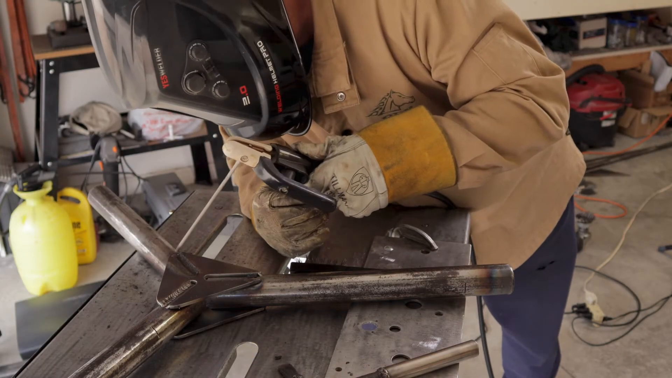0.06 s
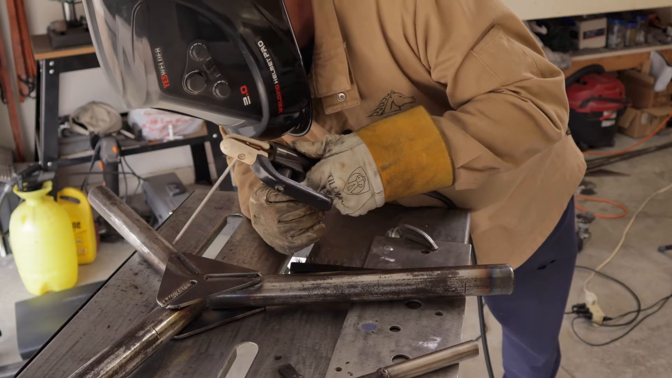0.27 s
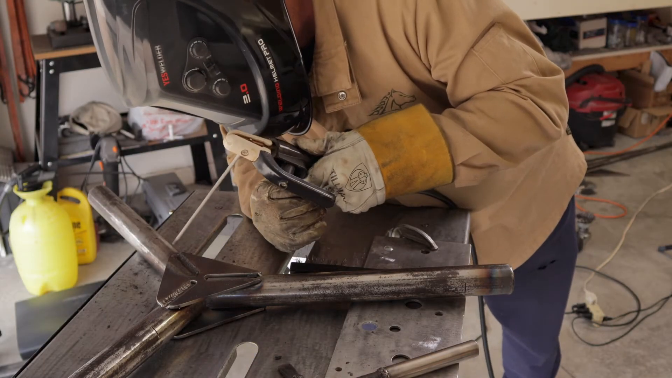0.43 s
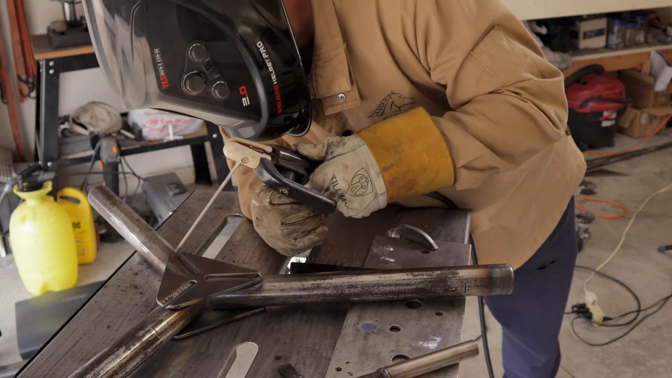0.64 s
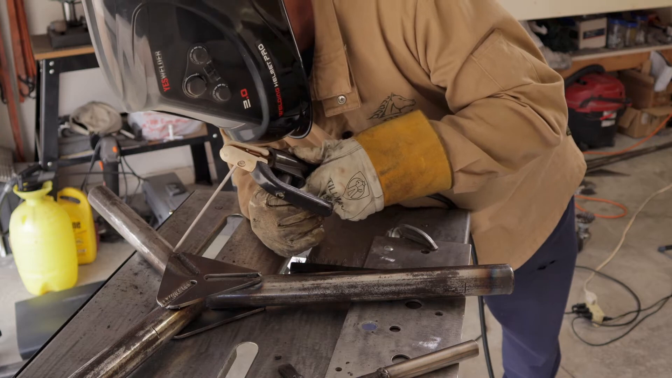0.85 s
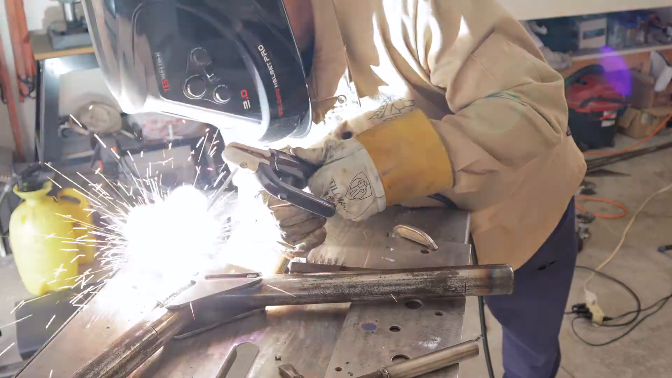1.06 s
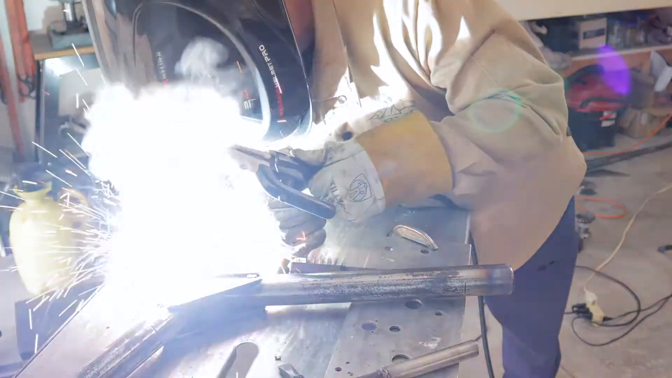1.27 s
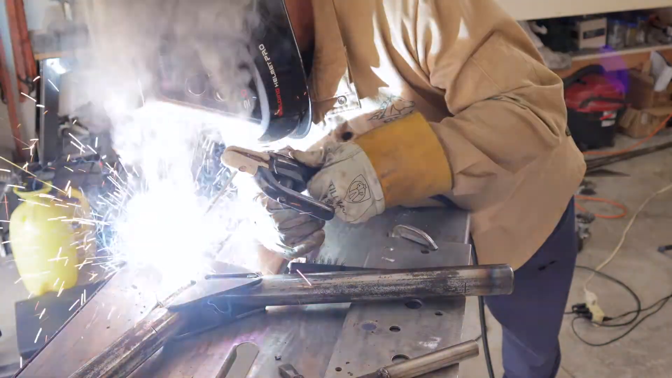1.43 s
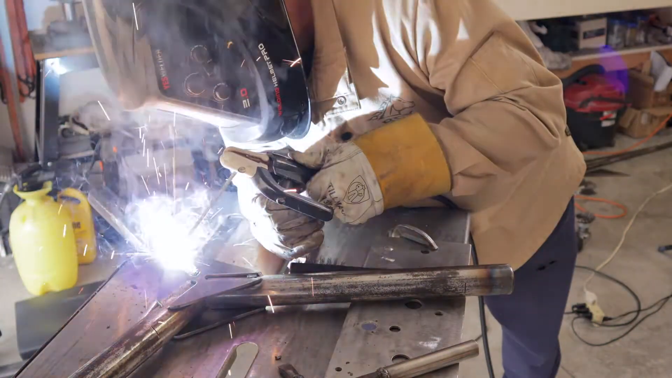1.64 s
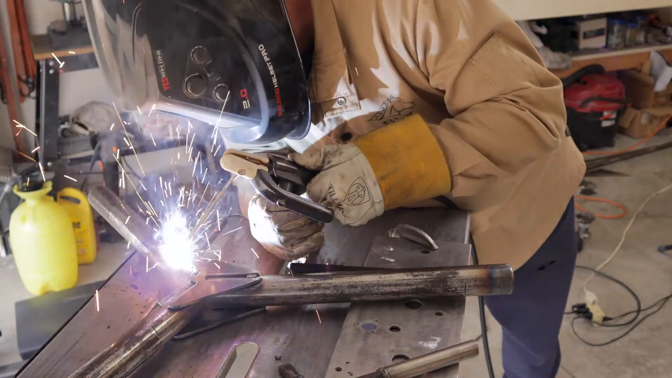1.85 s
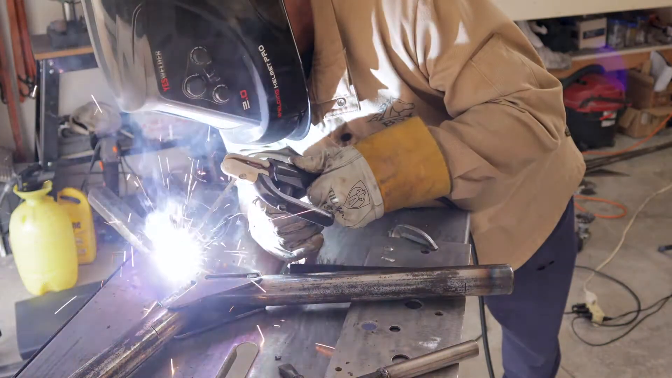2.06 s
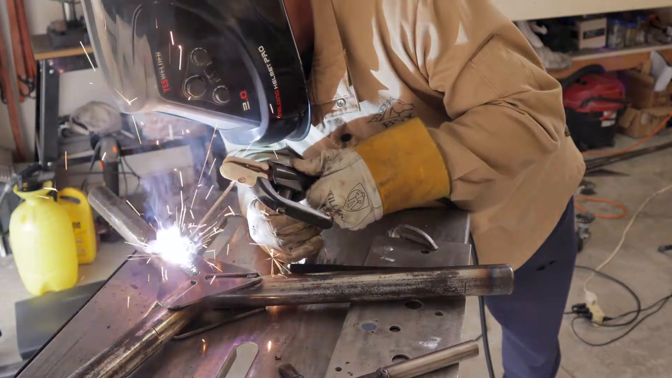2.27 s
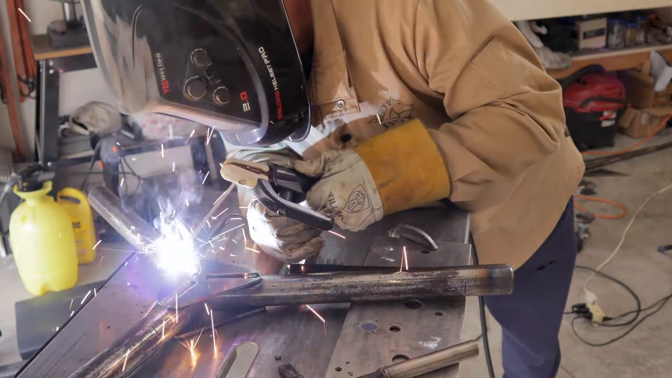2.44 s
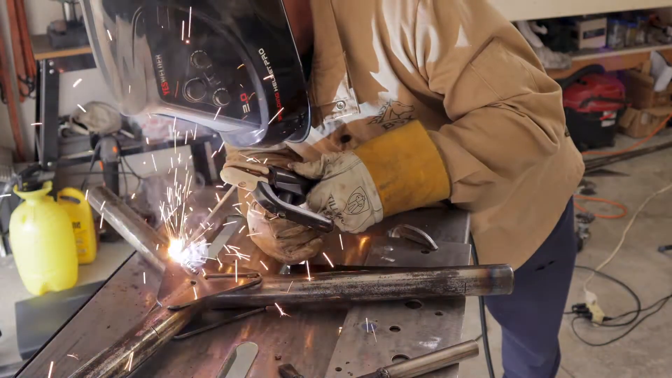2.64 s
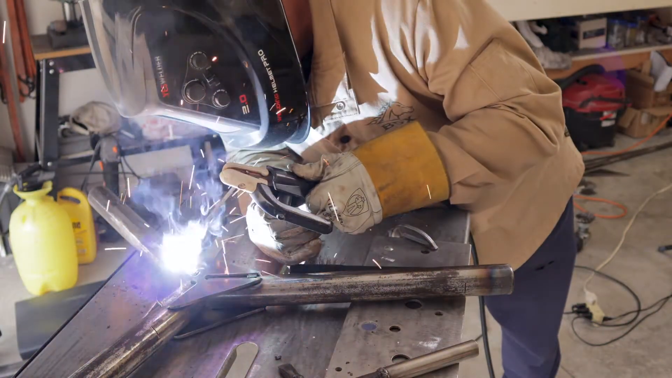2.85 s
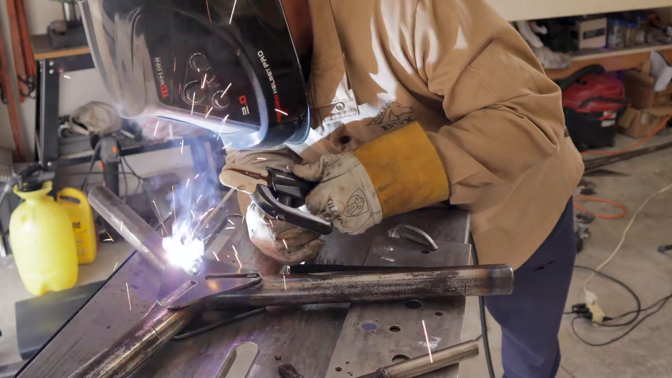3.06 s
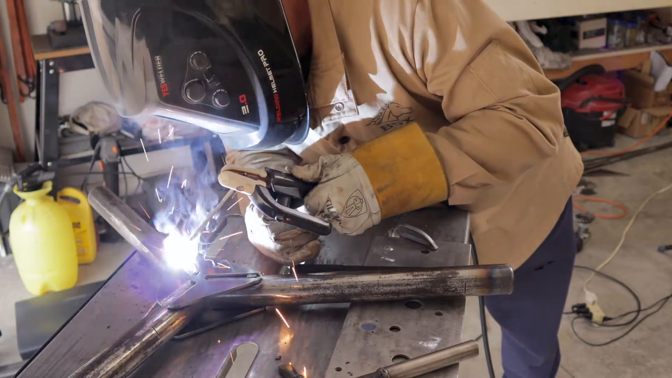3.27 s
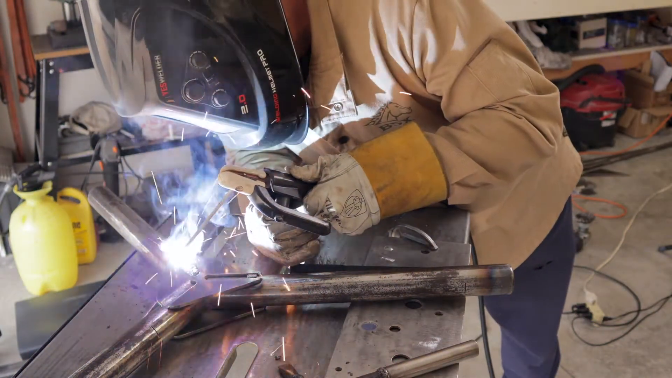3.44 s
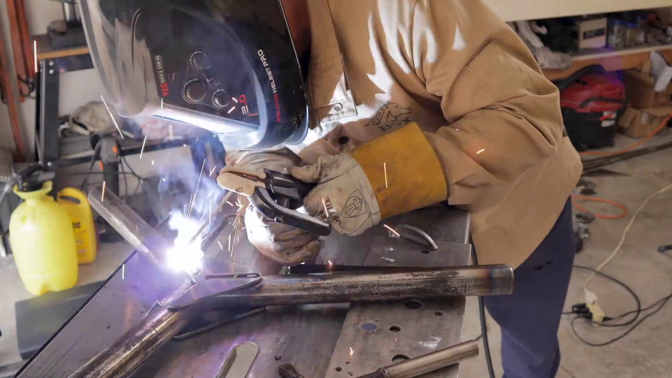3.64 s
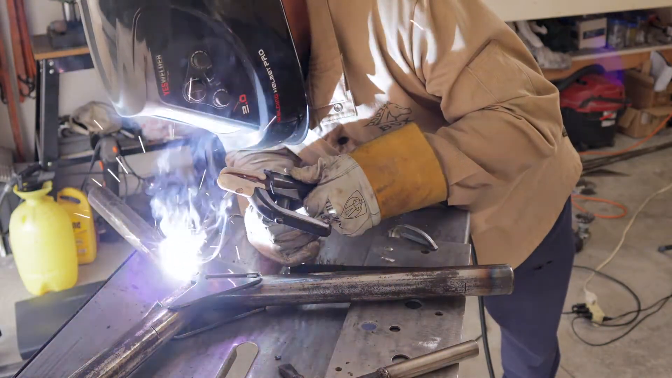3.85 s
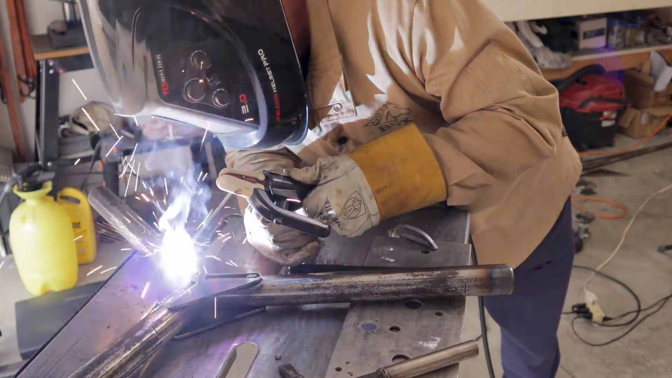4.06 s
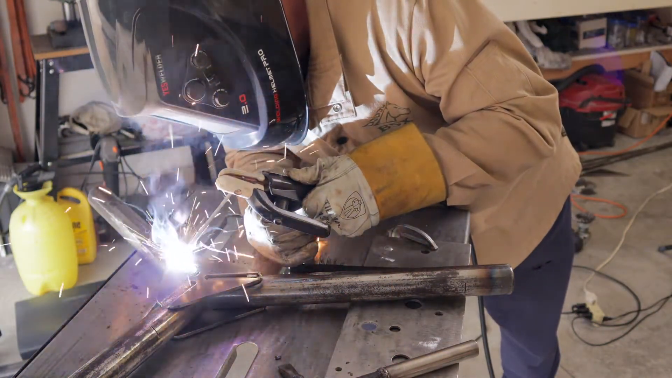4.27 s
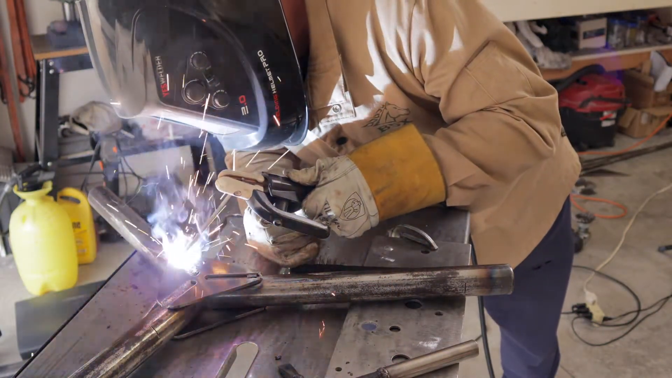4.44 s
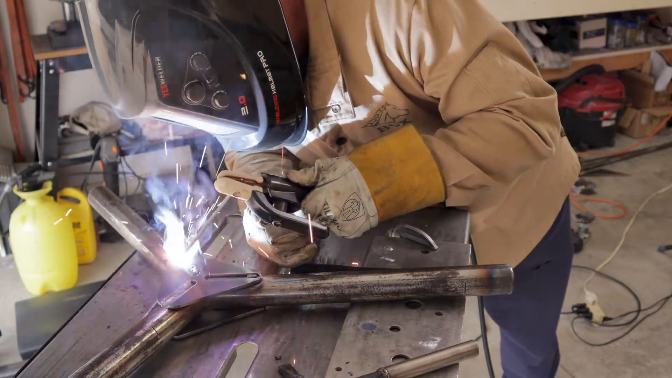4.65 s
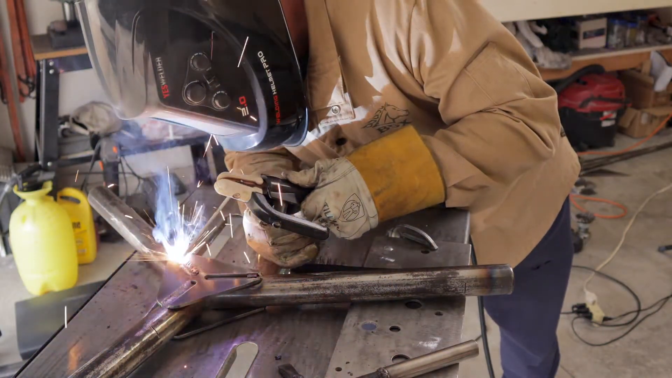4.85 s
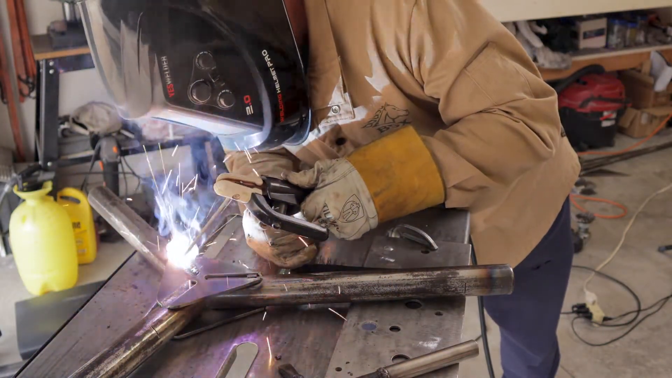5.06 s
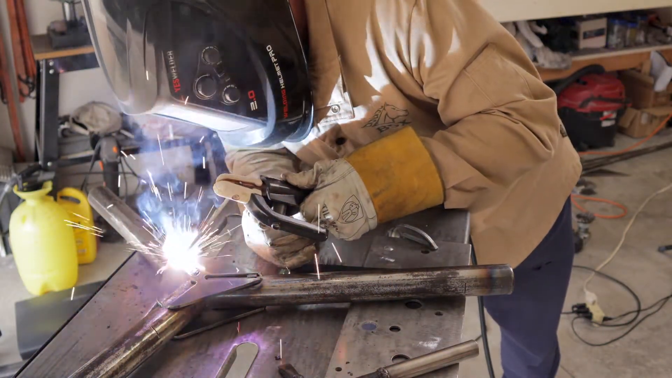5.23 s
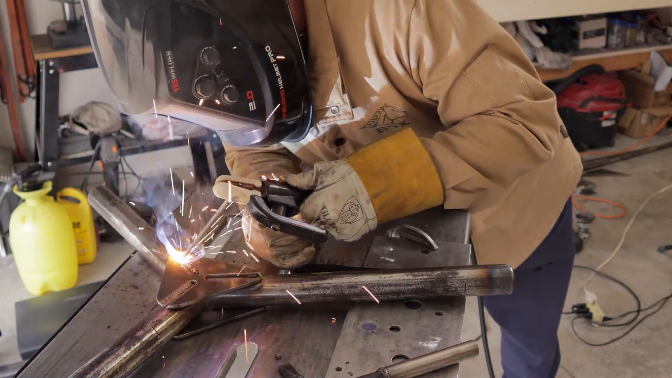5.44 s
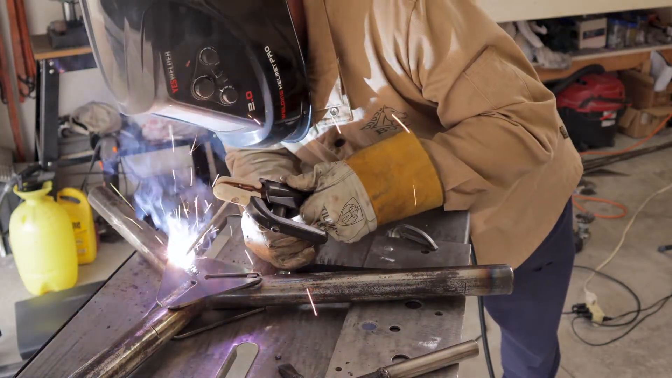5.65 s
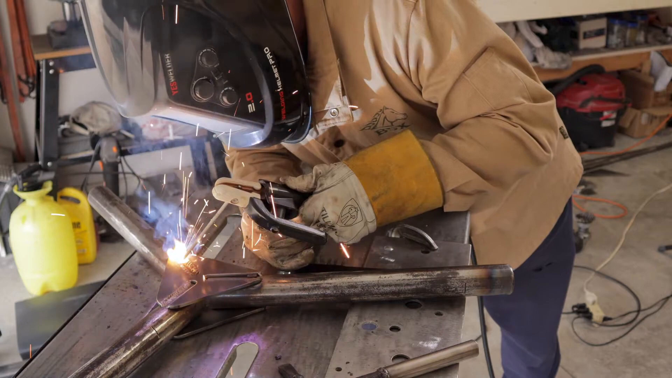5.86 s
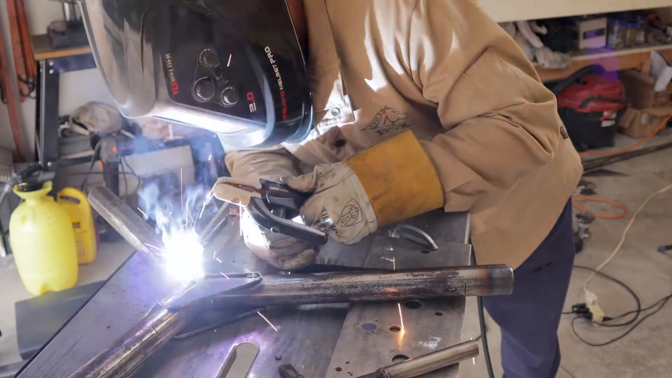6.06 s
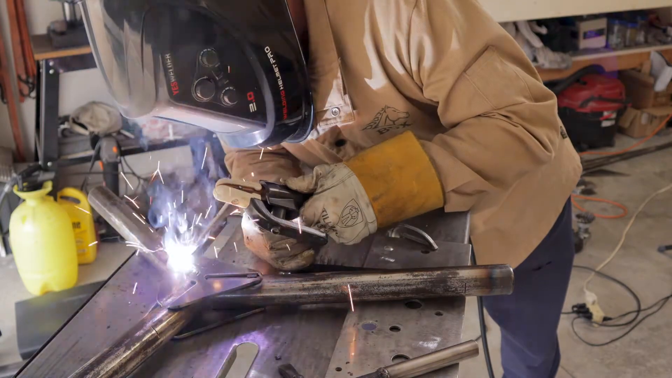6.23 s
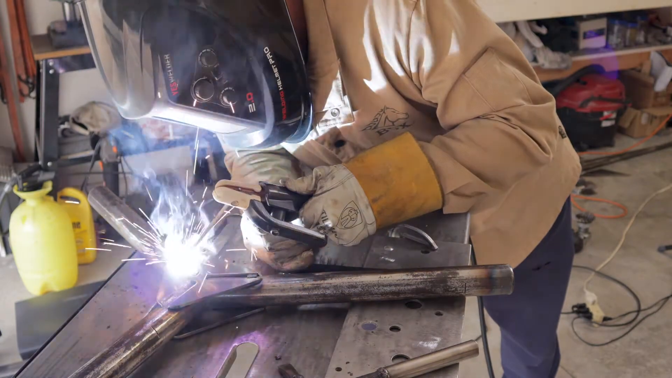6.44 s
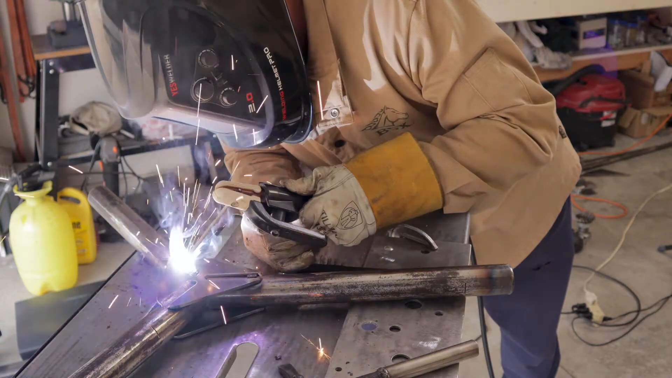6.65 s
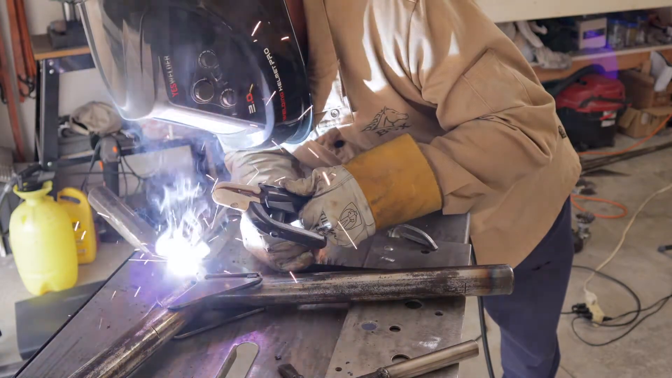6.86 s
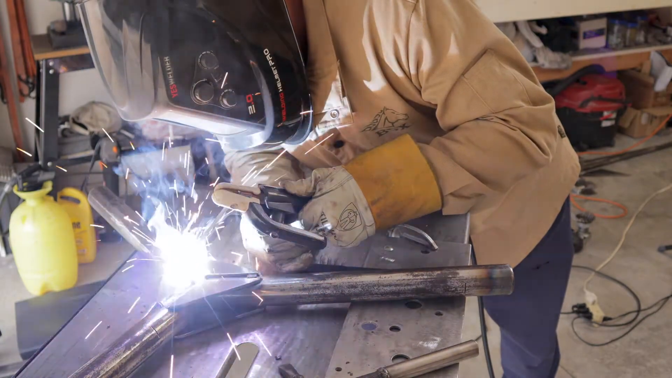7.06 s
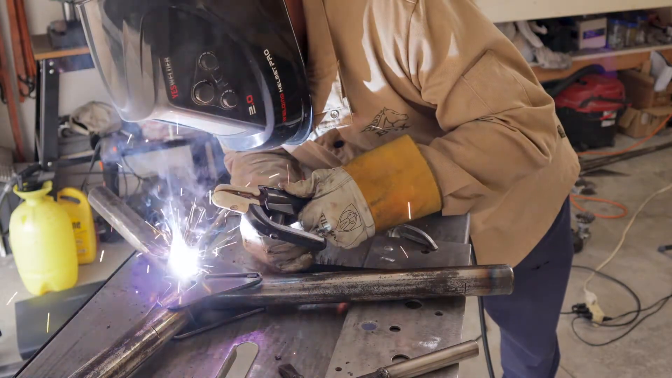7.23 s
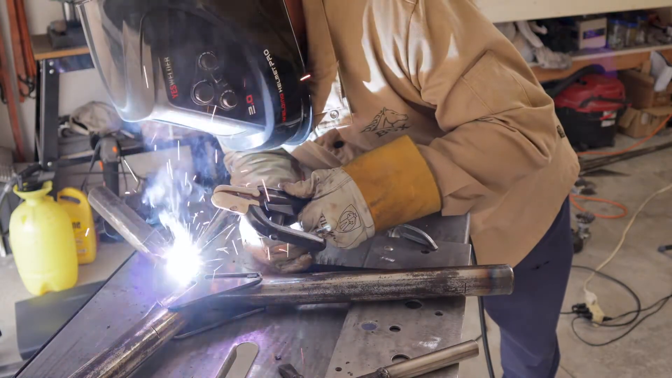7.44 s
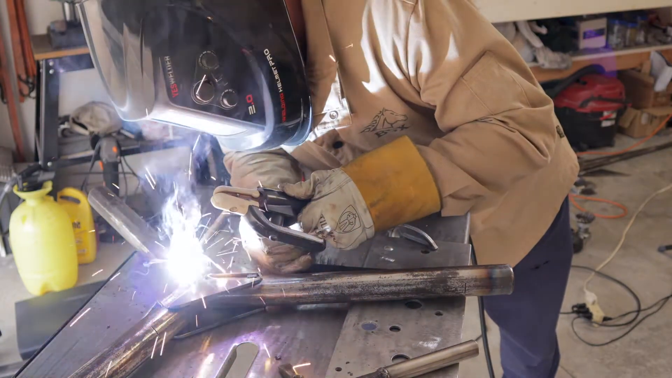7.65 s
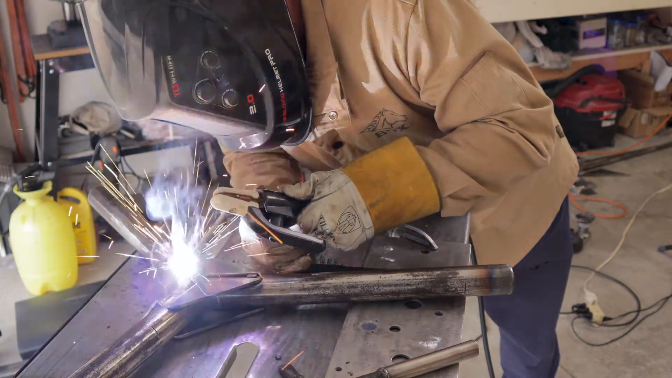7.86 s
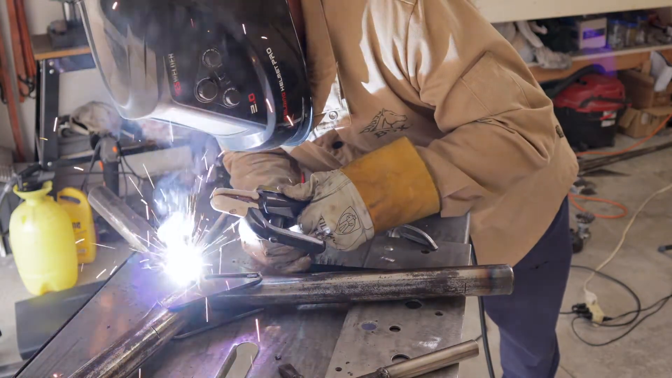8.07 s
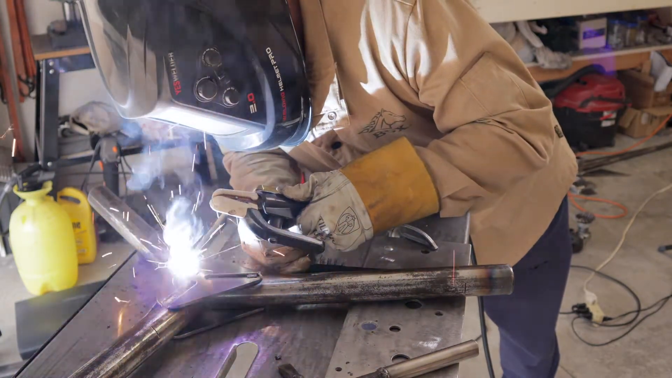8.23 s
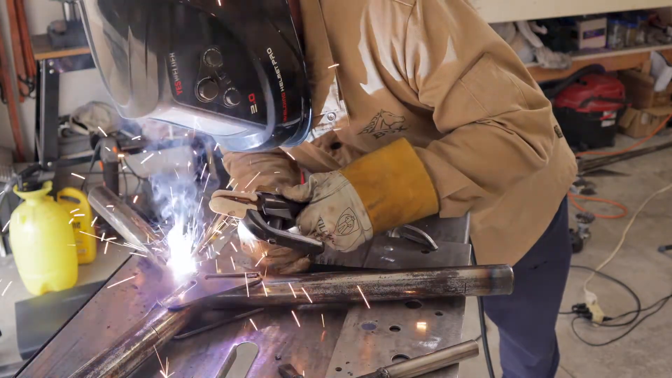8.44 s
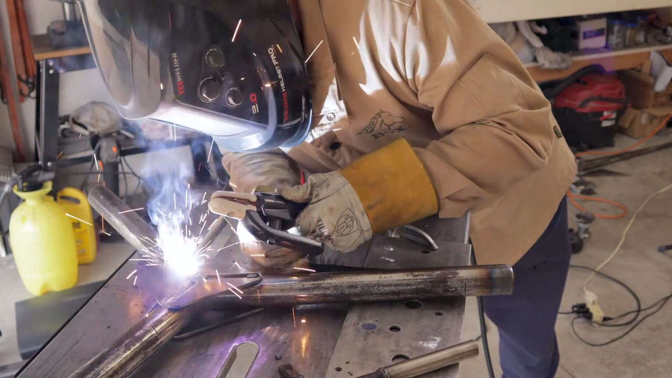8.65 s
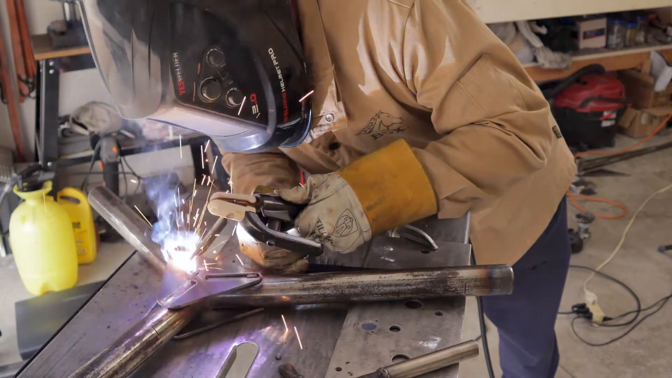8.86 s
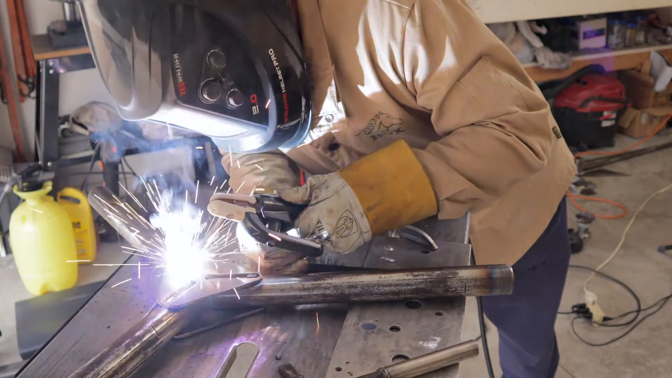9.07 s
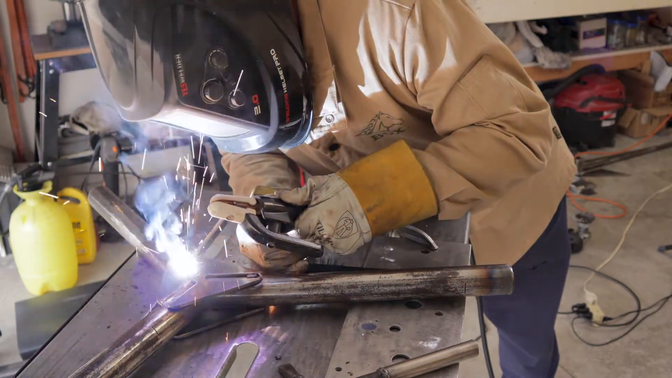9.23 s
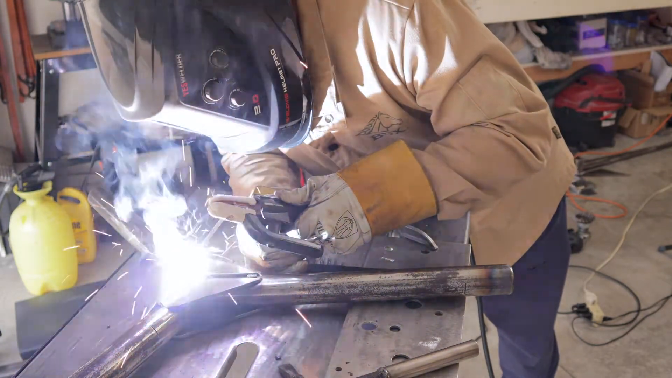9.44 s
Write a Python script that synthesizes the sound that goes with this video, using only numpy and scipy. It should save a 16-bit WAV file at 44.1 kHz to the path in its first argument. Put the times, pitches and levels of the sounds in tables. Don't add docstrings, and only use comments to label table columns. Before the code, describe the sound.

Close stereo pickup of stick welding on steel tube. Short bright scratches and ticks come first over a steady airy fan, then the arc bursts into a loud roar with dense snaps and hollow bloops. It quickly shrinks to thin sizzling and irregular spitting, livelier again later. Tiny pops hit the microphone, with one heavy knock late. The room is small and dry, and the arc is still burning at the end.

```python
import sys
import numpy as np
from scipy import signal
from scipy.fft import rfft, irfft
from scipy.io import wavfile
from scipy.ndimage import uniform_filter1d

SR = 44100
rng = np.random.default_rng(int(sys.argv[2]) if len(sys.argv) > 2 else 0)


def nominal_scale(level):
    x = np.asarray(level, float) / 20
    return 10 ** x


def persist_wave(psi):
    counts = np.round(np.clip(psi, -1, 1) * 32767).astype(np.int16)
    wavfile.write(sys.argv[1], SR, np.atleast_2d(counts).T)


N = 418950


def evened(x):
    return x / np.sqrt(np.mean(x ** 2) + 1e-20)


def read(points, hz):
    f, value = np.transpose(points)
    return np.interp(np.log(hz + 1), np.log(f + 1), value)


def curve(rows):
    s, *columns = np.transpose(rows)
    t = np.arange(N) / SR
    gate = uniform_filter1d(1. * (t >= s[0]) * (t <= s[-1]), size=200)
    return [np.interp(t, s, c) for c in columns] + [gate]


def add(mix, s, sound):
    part = mix[..., round(s * SR):][..., :sound.shape[-1]]
    part += sound[..., :part.shape[-1]]


def causal(points):
    gain_db = np.maximum(read(points, abs(np.fft.fftfreq(2048, 1 / SR))), -90)
    log_gain = np.log(nominal_scale(gain_db))
    taps = np.fft.ifft(np.exp(np.conj(signal.hilbert(log_gain)))).real[:1024]
    return taps / np.linalg.norm(taps)


def coloured(x, points):
    return evened(signal.oaconvolve(x, causal(points)[None], axes=1)[:, :N])


def resonate(x, hz, width):
    r = np.exp(-np.pi * width / SR)
    poles = [2, -4 * r * np.cos(2 * np.pi * hz / SR), 2 * r * r]
    return signal.lfilter([1 - r * r, 0, r * r - 1], poles, x)


def wander(rate_hz):
    steps = rng.standard_normal(4000)
    return evened(np.interp(np.arange(N) * rate_hz / SR, np.arange(4000), steps))


def swells(rows):
    power, t = np.zeros(N), np.arange(N) / SR
    fall_power = 1.9
    for s, rise, fall, db in rows:
        near = slice(max(round((s - 4 * rise) * SR), 0), round((s + 8 * fall) * SR))
        lag = t[near] - s
        rising = np.exp(-(lag / rise) ** 2)
        falling = np.exp(-abs(lag / fall) ** fall_power)
        power[near] += nominal_scale(2 * db) * np.where(lag < 0, rising, falling)
    return power


def sputter(per_s, spread_db, hiss, same):
    size = nominal_scale(spread_db * np.minimum(rng.exponential(1, N), 3.2)) * rng.choice([-1, 1], N)
    bursts = size * (rng.random(N) < per_s * nominal_scale(3.5 * wander(45)) / SR)
    hiss, same = np.clip(hiss, 0, 1), np.clip(same, 0, 1)
    air = rng.standard_normal((3, N))
    air = same * air[0] + np.sqrt(1 - same ** 2) * air[1:]
    return np.sqrt(hiss) * air * nominal_scale(3.06 * wander(90)) + np.sqrt(1 - hiss) * evened(bursts)


# frequency in Hz, level in dB.
FAN_AIR = [(24, -86), (40, -73), (98, -17.5), (356, -16), (440, -7), (472, -10.5), (506, -9.5), (773, -11),
           (1050, -8), (2030, -10.5), (2950, -13.5), (11000, -21), (14300, -85), (22000, -120)]
FAN_DB = -57
# time in seconds, level in dB.
FAN_LEVEL = [
    (0, 0),
    (0.5, 1),
    (0.92, -4),
    (1.05, 2.5),
    (2.3, 1.5),
    (5.4, 0),
    (7.2, 1.5),
    (9.5, 0.5),
]
# frequency in Hz, likeness from 0 to 1.
FAN_SAME = [(60, 1), (350, 0.97), (700, 0.95), (1200, 0.61), (2070, 0.67), (3200, 0.15), (5800, 0.38),
            (9600, 0.85), (15000, 1)]
# frequency in Hz, lead in radians.
FAN_LAG = [(300, 0), (1030, -0.2), (1400, -0.5), (2070, -1.6), (3450, -2), (4800, -2.8), (7000, -3.1)]
# frequency in Hz, level in dB.
HOUSING = [(430, -71), (516.8, -65.5), (587, -74.5), (678.3, -79), (978, -79), (1050, -73), (1265, -66),
           (1346, -71), (1530, -71.5), (1793, -88), (1962, -67.5)]
# time in seconds, pitch in Hz, level in dB.
WHINE = [(0.0, 1141, -65), (1.19, 1145, -64), (2.3, 1146, -63), (3.3, 1142, -63), (4.3, 1139, -61),
         (5.3, 1140, -62), (5.9, 1143, -66), (6.6, 1142, -63), (9.5, 1142, -64)]
# multiple of its pitch, level in dB.
OVERTONES = [(1, -3), (2, -8), (3, -14.5)]


def fan():
    frames, hz = N // 256 + 5, np.fft.rfftfreq(1024, 1 / SR)
    a, b, c, d, patches = rng.standard_normal((frames, 513, 5)).T
    patches = uniform_filter1d(patches, 8, axis=0)
    patches = evened(uniform_filter1d(patches, 14, axis=1))
    same = np.clip(read(FAN_SAME, hz), -1, 1)[:, None]
    left, other = a + 1j * b, c + 1j * d
    right = same * left + np.sqrt(1 - same ** 2) * other
    z = np.array([left * np.exp(1j * read(FAN_LAG, hz))[:, None], right])
    z = z * nominal_scale(read(FAN_AIR, hz)[:, None] + 1.38 * patches)
    air = evened(signal.istft(z, nperseg=1024, noverlap=768)[1][:, :N])
    ringing = sum(nominal_scale(db) * resonate(air, f, 8.6) for f, db in HOUSING)
    air = air + 0.42 * evened(ringing)
    blade_hz, tone_db, _ = curve(WHINE)
    turns = np.cumsum(blade_hz) / SR
    tone_db = tone_db + 2.3 * wander(23)
    tone = sum(nominal_scale(db + tone_db) * np.sqrt(2) * np.sin(2 * np.pi * k * turns) for k, db in OVERTONES)
    return nominal_scale(FAN_DB + curve(FAN_LEVEL)[0]) * evened(air) + tone * nominal_scale([[.6], [-.6]])


# frequency in Hz, seconds to fall by 60 dB.
SHOP = [(200, 0.076), (1000, 0.088), (4000, 0.14), (12000, 0.036)]


def shop(x):
    taps = np.zeros((2, SR // 2))
    slots = np.arange(200, SR // 2 - 20, 20)
    at = slots + rng.integers(0, 20, (2, (SR // 2 - 201) // 20))
    np.put_along_axis(taps, at, rng.choice([-1., 1.], at.shape), 1)
    hz, t, z = signal.stft(taps, SR, nperseg=256)
    decay = nominal_scale(-60 * t / read(SHOP, hz)[:, None])
    tail = signal.istft(z * decay, SR, nperseg=256)[1]
    return signal.fftconvolve(x.mean(0)[None], tail / np.linalg.norm(tail[0]), axes=1)[:, :N]


# start in seconds, left level in dB, right level in dB (opposite sign), slowness as a factor.
KNOCKS = [
    (1.3963, -16.5, -26, 0.84),
    (2.144, -35, -39, 1.1),
    (3.065, -42, -41, 2.3),
    (8.2371, -31.5, -32, 0.97),
    (8.471, 2.5, -23, 0.92),
    (8.56, -22, -37, 1.13),
]


def knocks():
    out, t = np.zeros((2, N)), np.arange(900) / SR
    for s, left_db, right_db, slow in KNOCKS:
        swing = np.sin(np.pi * np.log(1 + t / (.00008 * slow)) / 1.37) * np.exp(-t / (.00126 * slow))
        suck = -(t / 0.000082) * np.exp(1 - t / 0.00012)
        add(out, s, nominal_scale([[left_db], [right_db]]) * [swing, suck])
    return signal.lfilter(*signal.butter(3, 3600, fs=SR), out)


# time in seconds, level in dB (sounds 9.5 dB higher),
# pitch in Hz, left over right in dB beyond 13.
POPS = [(1.395, -24, 2670, 12), (1.78, -29, 3600, 17.5), (2.123, -35, 3130, 15), (2.144, -30, 2520, 16),
        (3.061, -32.5, 1700, -5), (3.492, -30.5, 3500, 15), (3.567, -32, 3370, -4),
        (4.3186, -31.5, 3400, 5.5), (4.923, -37, 4000, 12), (5.2872, -28, 3700, 17), (6.1449, -42, 3960, 4),
        (6.413, -31.5, 2740, 11.5), (6.8166, -28.5, 3110, 19), (7.3624, -31.5, 3000, 17),
        (7.769, -37, 2675, 9), (7.9364, -33.5, 2820, 18), (8.1667, -34.5, 2700, 15),
        (8.2348, -27, 3130, 17), (8.24, -33, 2540, 12), (8.3665, -37, 3120, -2), (8.461, -37, 3200, 12),
        (8.511, -39, 2000, 12), (8.9733, -29, 3230, 0), (8.992, -37, 3080, -2), (9.4542, -23, 3600, 11)]


def pops():
    out, t = np.zeros((2, N)), np.arange(-40, 100) / SR
    for s, db, hz, pan_db in POPS:
        shape = np.where(t < 0, np.exp(-(2.3 * t * hz) ** 2), np.exp(-1.4 * t * hz))
        flick = np.cos(2 * np.pi * hz * t) * shape
        flick = flick - shape * flick.sum() / shape.sum()
        sides = np.array([[1], [-nominal_scale(-pan_db - 13.0)]])
        add(out, s + 0.00045, nominal_scale(db + 9.5) * sides * flick)
    return out


# start in seconds, length in seconds, level in dB, pitch in Hz.
PUFFS = [
    (1.393, 0.038, -45.5, 474),
    (2.113, 0.074, -53, 570),
    (3.062, 0.031, -56, 2200),
    (3.063, 0.049, -49.5, 1130),
    (3.082, 0.061, -49.5, 490),
    (4.313, 0.048, -58, 910),
    (8.232, 0.027, -47.5, 496),
    (8.48, 0.021, -71, 2000),
    (8.482, 0.048, -52.5, 1150),
    (8.5, 0.056, -50.5, 480),
]


def puffs():
    out, air, t = np.zeros(N), rng.standard_normal(N), np.arange(8000) / SR
    for s, length, db, hz in PUFFS:
        shape = np.minimum(t / 0.006, 1) * np.exp(-(t / length) ** 3)
        whoosh = resonate(air[round(s * SR):][:8000], hz, 0.55 * hz)
        whoosh = evened(resonate(whoosh, hz, 3.6 * hz))
        add(out, s, nominal_scale(db) * shape * whoosh)
    return out * nominal_scale([[1.5], [-1.5]])


# frequency in Hz, level in dB.
STEEL = [(4037, -50), (5066, -67), (5690, -62), (5938, -71), (6179, -79), (6535, -76), (7014, -63),
         (7983, -79), (8479, -56), (8622, -56), (8915, -59), (9324, -54), (11138, -56), (14357, -62)]


def steel(x, width_hz=16):
    ringing = sum(nominal_scale(db) * resonate(x, hz, width_hz) for hz, db in STEEL)
    return evened(ringing) * np.std(x)


# frequency in Hz, lead in radians.
PORTS = [(0, 0), (2700, 0.2), (3450, 0.8), (4100, 2.4), (4800, 1.2), (6900, 1.9), (9600, 2.4), (11000, 1.9),
         (13100, 2.2), (16400, 2.8)]


def from_weld(x, pan_db):
    f, lead = np.transpose(PORTS)
    left, right = x
    turn = np.exp(1j * np.interp(np.fft.rfftfreq(N, 1 / SR), f, lead))
    left = irfft(rfft(left) * turn, N)
    return np.array([left * nominal_scale(pan_db / 2), right * nominal_scale(-pan_db / 2)])


# frequency in Hz, level in dB.
SCRATCH_COLOUR = [(1470, -54), (2500, -24), (4210, -7), (5610, -2.5), (7020, -7), (7830, 0.5), (9360, -18),
                  (11200, -5.5), (16000, -19)]
# frequency in Hz, width in Hz, level in dB.
ROD_MODES = [(3930, 36, -6.5), (5120, 50, -10), (5650, 97, 1), (6760, 38, -5), (7320, 42, -4),
             (7660, 87, -7), (10200, 49, -7), (11500, 31, -15), (12600, 34, -11), (13100, 37, -9),
             (14400, 48, -16), (15300, 190, -19)]
# loudest moment in seconds, rise in seconds, fall in seconds, level in dB.
STROKES = [
    (0.015, 0.0015, 0.002, -60),
    (0.021, 0.002, 0.003, -51),
    (0.027, 0.004, 0.004, -47),
    (0.045, 0.012, 0.017, -45),
    (0.188, 0.013, 0.028, -44),
    (0.313, 0.0011, 0.02, -49),
    (0.33, 0.0055, 0.028, -40.5),
    (0.341, 0.0088, 0.0057, -34),
    (0.352, 0.008, 0.019, -49),
]
# start in seconds, peak level in dB, ring in Hz.
ROD_TAPS = [
    (0.026, -21, 7880),
    (0.047, -31, 5300),
    (0.162, -21.5, 7880),
    (0.34, -26, 5650),
    (0.9386, -28, 7800),
]


def rod():
    scratch = sputter(3300, 3.0, 0.85, 0.48)
    song = sum(nominal_scale(db) * evened(resonate(scratch, hz, 2.2 * width)) for hz, width, db in ROD_MODES)
    scrape = coloured(scratch, SCRATCH_COLOUR) + 0.74 * evened(song)
    out = np.sqrt(swells(STROKES)) * evened(scrape)
    t = np.arange(400) / SR
    for s, db, hz in ROD_TAPS:
        add(out, s, nominal_scale(db) * np.sin(2 * np.pi * hz * t) * (t / 0.0014) * np.exp(1 - t / 0.00075))
    return out


# start in seconds, peak level in dB, pitch in Hz.
BLOOPS = [
    (1.0694, -42.5, 1290),
    (1.0797, -35, 1510),
    (1.0931, -35, 1380),
    (1.2055, -36, 1507),
    (1.2687, -40, 1350),
    (1.293, -42, 1480),
]


def bloops():
    out, t = np.zeros(N), np.arange(1500) / SR
    for s, db, hz in BLOOPS:
        ring = np.sin(2 * np.pi * hz * t) * (t / 0.003) * np.exp(1 - t / 0.0023)
        add(out, s, nominal_scale(db + 2.5) * ring)
    return out


# time in seconds, peak level in dB, pitch in Hz.
SNAPS = [(0.9603, -37, 6900), (1.1515, -12, 9100), (1.2475, -16, 6060), (1.4153, -10.5, 10200),
         (1.5226, -25.5, 6650), (1.736, -23.5, 14200), (1.957, -26, 8500), (2.017, -25, 14200),
         (2.117, -19, 13500), (2.1453, -23.5, 6660), (2.385, -31, 9170), (2.427, -21, 9290),
         (2.4926, -25.5, 8340), (3.739, -22, 13800), (4.92, -23.5, 11500), (6.1273, -25, 9050),
         (6.179, -23, 8900), (6.413, -22.5, 11400), (6.512, -19.5, 8750), (6.805, -21, 10600),
         (7.485, -30, 8500), (7.6012, -19.5, 9400), (7.8765, -25.5, 9100), (8.383, -23, 9000),
         (8.9561, -31, 12800), (9.015, -23, 12700), (9.077, -30, 13000), (9.107, -23, 8800),
         (9.1304, -20, 9300)]
# time in seconds,
# peak level in dB.
DROPLET_TICKS = [(0.9668, -31), (1.0729, -30), (1.092, -27), (1.1145, -20), (1.1309, -23), (1.1516, -22),
                 (1.1545, -21), (1.163, -19), (1.209, -31), (1.237, -32), (1.273, -25), (1.292, -21),
                 (1.2952, -16), (1.3, -21), (1.307, -17), (1.317, -14), (1.3462, -33), (1.381, -28),
                 (1.3953, -24), (1.4002, -21), (1.42, -15), (1.4425, -22), (1.5118, -31), (1.5294, -31),
                 (1.569, -21.5), (1.617, -29), (1.6355, -47), (1.6866, -35), (1.7173, -42), (1.7466, -31),
                 (1.7816, -32), (1.7928, -40), (1.8248, -33), (1.9213, -29), (1.962, -27), (1.9934, -37),
                 (2.022, -24), (2.0473, -35), (2.0734, -29), (2.1535, -26), (2.1587, -26), (2.3567, -27),
                 (2.3747, -23), (2.3913, -30), (2.408, -19.5), (2.4315, -29), (2.4371, -39), (2.48, -26),
                 (2.5007, -24), (2.5078, -41), (2.5345, -30), (2.539, -25), (2.5762, -29), (2.662, -35),
                 (2.8477, -36), (2.9972, -35), (3.157, -30.5), (3.2275, -34), (3.4346, -48), (3.4924, -44),
               (3.6001, -37), (3.6442, -35), (3.6522, -39), (3.7158, -37), (3.749, -36), (3.7741, -32),
               (3.818, -38), (4.0092, -28), (4.0427, -24), (4.0624, -29), (4.1713, -33.5), (4.2178, -37),
               (4.319, -31), (4.4432, -34), (4.468, -38), (4.6449, -49), (4.7249, -38), (4.8001, -28),
               (4.8834, -31), (4.8909, -41), (4.9011, -45), (4.9573, -38), (4.9784, -33), (4.9853, -32),
               (5.0796, -35), (5.1056, -39), (5.2521, -37), (5.288, -34), (5.292, -30), (5.339, -28),
               (5.5587, -35), (5.6044, -28), (5.6547, -30), (5.6635, -37), (5.7698, -34), (5.7778, -34),
               (5.8356, -40), (5.8996, -37), (5.9539, -44), (6.1565, -28), (6.1666, -23), (6.1924, -30),
               (6.2775, -42), (6.3008, -32), (6.326, -35), (6.345, -30), (6.3493, -34), (6.4082, -29),
                 (6.4765, -37), (6.4945, -33), (6.5335, -23), (6.5836, -29), (6.6219, -26), (6.6327, -34),
              (6.6535, -33), (6.675, -37), (6.6941, -31), (6.7092, -21), (6.747, -32), (6.7772, -41),
              (6.7884, -25), (6.819, -32), (6.8545, -29), (6.888, -31), (6.9527, -39), (6.9606, -39),
              (6.9874, -40), (7.007, -32), (7.0541, -35), (7.07, -34), (7.1495, -36), (7.1752, -28),
              (7.203, -24), (7.2284, -29), (7.363, -23), (7.4606, -32), (7.493, -26), (7.596, -26),
              (7.8442, -32), (7.851, -29), (7.884, -31), (8.167, -30), (8.205, -32), (8.2344, -28),
              (8.2404, -31), (8.3207, -34), (8.3645, -31), (8.4092, -28), (8.4701, -39), (8.6692, -33),
              (8.723, -33), (8.7614, -32), (8.784, -41), (8.7918, -32), (8.815, -30), (8.9656, -31),
              (8.9725, -30), (9.0708, -28), (9.0985, -32), (9.1863, -38), (9.3129, -26.5), (9.4433, -25),
              (9.456, -30)]
TICKS = DROPLET_TICKS
# time in
# seconds, peak level in dB.
SPITS = [(0.9672, -26), (1.0283, -27), (1.209, -28), (1.2746, -21), (1.3467, -28), (1.3815, -25),
         (1.5224, -19), (1.535, -23), (1.6905, -29), (1.7177, -39), (1.7515, -28), (1.7936, -41),
         (1.9939, -36), (2.0116, -29), (2.0283, -29), (2.0714, -33), (2.0883, -34), (2.118, -29),
         (2.2508, -27), (2.2765, -33), (2.3715, -32), (2.385, -23), (2.3917, -21), (2.4075, -18),
         (2.4376, -32), (2.4867, -27), (2.538, -34), (3.0615, -30), (3.317, -39), (3.4352, -46),
         (3.517, -36), (3.5664, -32), (3.742, -33), (3.7745, -30), (3.8169, -38), (3.9847, -34),
         (3.9992, -33), (4.2217, -38), (4.247, -29), (4.6453, -41), (4.6881, -42), (4.8648, -37),
         (4.9016, -34), (4.9234, -30), (4.9577, -31), (5.033, -34), (5.3442, -39), (5.836, -39),
         (6.2942, -34), (6.3276, -32), (6.4248, -31), (6.4769, -29), (6.5895, -29), (6.6767, -30),
         (6.7251, -21),
         (6.7342, -33), (6.7777, -30), (6.8511, -36), (6.907, -35), (6.918, -34), (6.9233, -33.5),
              (6.935, -33), (6.96, -38), (7.0712, -32), (7.0814, -33), (7.116, -36), (7.1323, -32),
              (7.1365, -17), (7.1398, -25), (7.1695, -29), (7.2197, -31), (7.3304, -38), (7.355, -36),
              (7.4663, -36), (7.49, -33), (7.5356, -34), (7.539, -28), (7.6283, -35), (7.692, -34),
              (7.696, -34), (7.8579, -34), (7.8729, -32), (7.9373, -33), (7.9689, -36), (8.0013, -37),
              (8.0374, -33), (8.0451, -29), (8.0925, -35), (8.1474, -37), (8.2115, -36), (8.2229, -38),
              (8.234, -43), (8.367, -34), (8.4367, -35), (8.4617, -36), (8.4986, -43), (8.576, -33),
              (8.6697, -34), (8.7212, -36), (8.7845, -35), (8.8321, -34), (8.9576, -27), (8.9657, -26),
              (9.0439, -32), (9.0603, -38), (9.0779, -24), (9.1868, -35), (9.234, -35), (9.2937, -39),
              (9.4283, -33)]
# frequency in Hz, level in dB.
SIZZLE = [(2060, -43.5), (3500, -20.5), (6200, -7), (8440, 5), (9800, 4), (11500, 1.5), (13100, 5.5),
          (14800, 5.5), (16000, -6), (16600, -37)]


def snaps():
    blink_cycles, spray_db = 0.8, -19
    out, t = np.zeros(N), np.arange(-20, 400) / SR
    spray = coloured(rng.standard_normal((1, N + 420)), SIZZLE)[0]
    small = [(s, db, rng.uniform(7800, 13500)) for s, db in TICKS + SPITS]
    for s, db, hz in SNAPS + small:
        blink = np.sin(2 * np.pi * hz * t + .8) * np.exp(-(t * hz / blink_cycles) ** 2)
        hiss = spray[round(s * SR):][:len(t)] * np.exp(-t / 0.0025) * (t > 0)
        add(out, s + 0.00055, nominal_scale(db - 0.5) * (blink + nominal_scale(spray_db) * hiss))
    return out * nominal_scale([[2.5], [-2.5]])


def patchy(x, depth_db):
    z = signal.stft(x, nperseg=256)[2]
    field = uniform_filter1d(rng.standard_normal(z.shape[1:]), 7, axis=0)
    field = evened(uniform_filter1d(field, 5, axis=1))
    return evened(signal.istft(z * nominal_scale(depth_db * field), nperseg=256)[1][:, :N])


# time in seconds, sizzle in dB, roar in dB.
ARC = [(0.93, -79, -77), (0.965, -34, -46), (1.0, -44, -44), (1.08, -37, -36.5), (1.18, -37, -40.5),
       (1.3, -35.5, -39.5), (1.42, -39, -42.5), (1.48, -44.5, -57), (1.65, -59, -62.5), (2.6, -64, -61.5),
       (3.4, -63, -63), (4.3, -58, -61), (5.95, -65, -66.5), (6.3, -53.5, -67), (7.0, -63.5, -67.5),
       (7.9, -54, -56), (8.5, -61, -64), (9.5, -55, -59)]
# loudest moment in seconds, fall in seconds, sizzle in dB.
FLARES = [(1.524, 0.017, -34), (1.742, 0.016, -50), (2.015, 0.09, -48.5), (2.126, 0.049, -41.5),
          (2.38, 0.11, -44), (2.389, 0.02, -38.5), (3.06, 0.019, -49), (3.213, 0.031, -48),
          (3.504, 0.058, -52.5), (3.742, 0.052, -42.5), (3.995, 0.051, -44.5), (4.906, 0.13, -52.5),
          (5.268, 0.055, -50.5), (5.45, 0.018, -54), (5.6, 0.075, -51), (5.765, 0.042, -48),
          (6.128, 0.033, -43), (6.149, 0.071, -41), (6.333, 0.015, -40.5), (6.488, 0.43, -47.5),
          (6.709, 0.021, -45.5), (6.793, 0.086, -49.0), (7.066, 0.028, -45.5), (7.144, 0.051, -42),
          (7.487, 0.066, -54), (7.6, 0.015, -45), (8.232, 0.042, -49), (8.379, 0.054, -44),
          (8.667, 0.026, -53), (8.966, 0.063, -49), (9.079, 0.026, -40)]
# frequency in Hz, level in dB.
ROAR = [(88, -62), (150, -43), (216, -30), (505, -14), (1090, -14.5), (1350, -0.5), (1700, -8.5),
        (2080, -4), (3540, -5), (6770, -3.5), (8000, -8.5), (10400, -29.5), (17600, -120)]


def arc():
    rise_share, flare_roar_db = 0.29, -12.5
    flash_s, flash_db = 0.0042, -17.5
    stutter_db, stutter_per_s = 5.5, 130
    crackle_per_s, crackle_spread_db, crackle_db = 900, 1.5, -4.5
    depth_db = 2.5
    sizzle_db, roar_db, gate = curve(ARC)
    flare = swells([(s, rise_share * fall, fall, db) for s, fall, db in FLARES])
    flare += swells([(s, rise_share * flash_s, flash_s, db + flash_db) for s, db, *_ in SNAPS + TICKS])
    stutter = nominal_scale(2 * stutter_db * (wander(stutter_per_s) - 1.5))
    sizzle = np.sqrt(nominal_scale(2 * sizzle_db) + flare * stutter)
    roar = np.sqrt(nominal_scale(2 * roar_db) + flare * nominal_scale(2 * flare_roar_db))
    column = sputter(2500, 2.6, 0.67, 0.4)
    spits = nominal_scale(crackle_spread_db * np.minimum(rng.exponential(1, N), 2.5))
    spits = spits * (rng.random(N) < crackle_per_s / SR)
    spitting = column + nominal_scale(crackle_db) * evened(spits)
    middle = column.mean(0)
    body = middle + signal.lfilter(*signal.butter(2, 2200, "high", fs=SR), column - middle)
    bright = sizzle * patchy(coloured(spitting, SIZZLE), depth_db)
    low = roar * patchy(coloured(body, ROAR), depth_db)
    return gate * (bright + low)


def scene():
    weld = arc() + snaps() + rod() + bloops()
    weld = from_weld(weld + 0.35 * steel(weld.mean(0)), pan_db=2.6)
    bumps = knocks() + pops() + puffs()
    echoes = shop(nominal_scale(-8.0) * weld + nominal_scale(-32) * bumps)
    return weld + bumps + echoes + fan()


def roll_off(x):
    return signal.sosfilt(signal.butter(12, 16300, fs=SR, output="sos"), x)


def record(dry):
    thin = signal.sosfilt(signal.butter(3, 100, "high", fs=SR, output="sos"), dry)
    thin = signal.sosfilt(signal.butter(10, 16100, fs=SR, output="sos"), thin)
    return roll_off(thin)


dry = scene()
out = record(dry)
persist_wave(out)
```